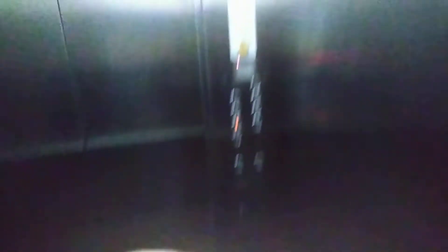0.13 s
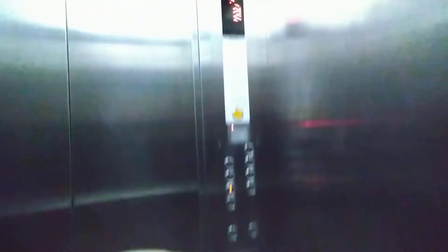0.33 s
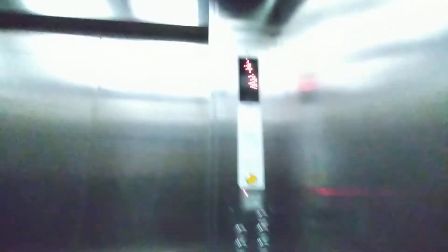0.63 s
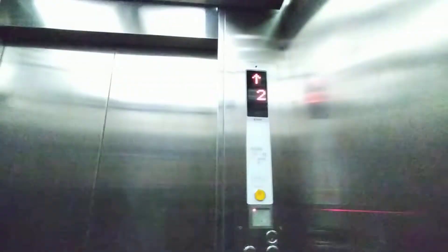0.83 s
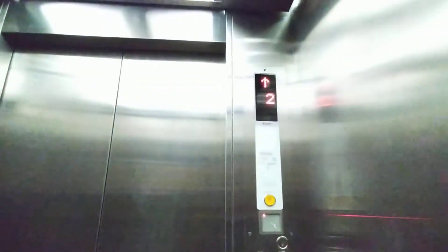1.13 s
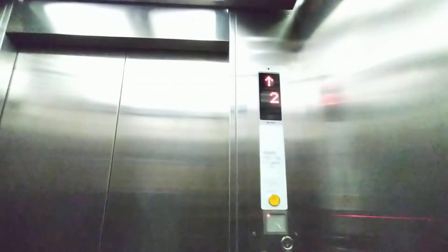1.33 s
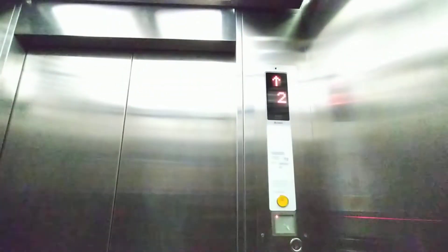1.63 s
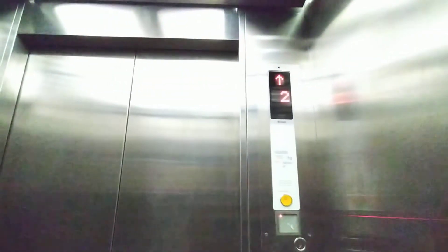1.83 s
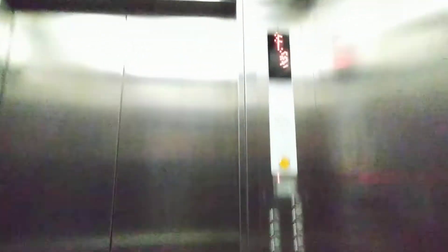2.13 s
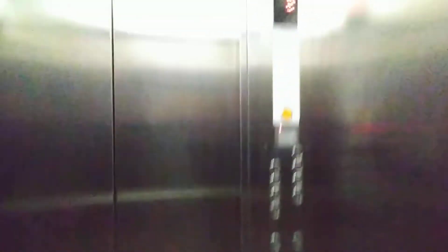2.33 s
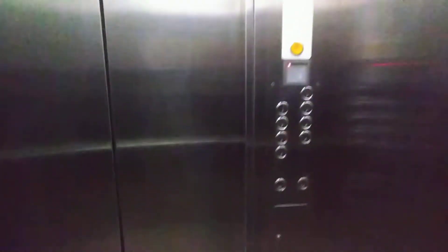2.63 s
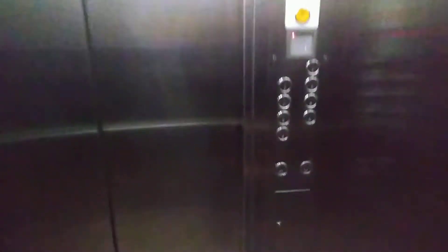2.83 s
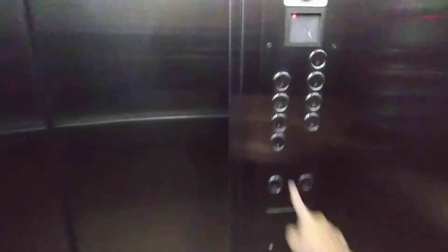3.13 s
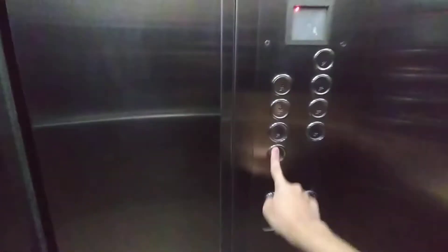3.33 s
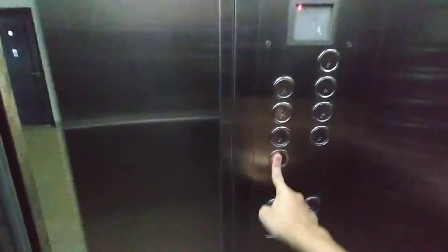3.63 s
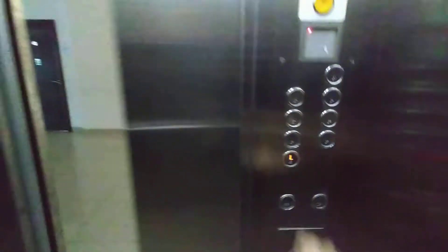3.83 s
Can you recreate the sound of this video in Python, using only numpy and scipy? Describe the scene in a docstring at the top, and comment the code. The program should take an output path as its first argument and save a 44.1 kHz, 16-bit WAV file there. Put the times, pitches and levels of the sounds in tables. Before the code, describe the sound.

Elevator doors opening, heard inside a steel car on a handheld microphone. A low motor hum and faint high whine run throughout; soft ride noise fades over the first second. A faint groan at 1.8 s, then a latch clank at 2.5 s; panels rumble, groan and scrape with cloth swishes. Around 3.5-3.6 s a button clicks, rollers thump rapidly, and a loud ringing clank lands near 3.86 s.

```python
"""Inside a steel elevator car: the motor hums, the ride noise dies away and the doors unlatch.
The panels roll open with a groan, scrapes, metal clanks and a run of roller thumps;
a sleeve swishes as an arm reaches out and clicks a button.
Rolling, cloth and machine noise are shaped random noise; groan, hum and whine are drifting sines;
struck steel is a sum of decaying modes with dense echoes, and scrapes are gliding resonances."""
import sys
import numpy as np
from scipy import signal
from scipy.fft import rfft, irfft
from scipy.io import wavfile

SR = 44100
rng = np.random.default_rng(int(sys.argv[2]) if len(sys.argv) > 2 else 0)


def to_wav(sig):
    """Store sig (one row per channel, or 1-D mono) as 16-bit WAV at the path in sys.argv[1].

    Samples outside -1..1 are clipped; the rate is SR.
    """
    pcm = np.clip(np.atleast_2d(sig), -1, 1) * 32767
    pcm = np.round(pcm).astype(np.int16)
    wavfile.write(sys.argv[1], SR, pcm.T)  # frames by channels


N = 176400
T = np.arange(N) / SR
HIT_T = T[:SR]  # time axis of one blow, 1 s

# Levels are relative to the sound's own gain factors; t60 is the time to decay by 60 dB.
# door panels rolling on their track: f/Hz, density/(dB per Hz)
ROLL_SPECTRUM = [(25, -112), (60, -83.5), (100, -84), (137, -65), (175, -69), (215, -68), (280, -67),
                 (380, -71.5), (480, -75), (650, -79), (1000, -87), (1600, -88.5), (3000, -97.5),
                 (4200, -111), (16000, -118)]
# swell of the rolling: t/s, level/dB
ROLL_LEVEL = [(2.0, -35), (2.25, -9), (2.44, -4.5), (2.52, -2), (2.68, 3), (2.8, -0.5), (2.93, -4),
              (3.04, 3.5), (3.2, -2.5), (3.32, -0.5), (3.42, -1), (3.48, 6), (3.58, 1.5), (3.66, 5),
              (3.86, 11), (4, 0.5)]
# rattle of the fast-moving panels: f/Hz, density/(dB per Hz)
RATTLE_SPECTRUM = [(25, -112), (80, -83), (170, -52), (330, -64.5), (430, -65.5), (520, -67), (650, -62.5),
                   (800, -78), (1100, -77), (1600, -80), (2500, -90.5), (3300, -104), (16000, -118)]
# course of the rattle: t/s, level/dB
RATTLE_LEVEL = [(3.4, -60), (3.52, -31), (3.605, -10), (3.64, 0), (3.86, -3.5), (3.93, -10), (4, -25)]
# resonances of the rattling panels: f/Hz, pole width/Hz, level/dB
PANEL_RESONANCES = [(167.1, 6.9, -35.5), (188.8, 10.6, -35.5), (547, 24, -54), (607, 79, -53),
                    (692, 23, -52)]
# roller thumps: t/s, level/dB
THUMPS = [(3.492, -36), (3.624, -24.5), (3.6468, -23), (3.671, -24.5), (3.718, -23), (3.7607, -21.5),
          (3.8036, -28), (3.8448, -27), (3.8987, -27.5), (3.951, -29.5)]
# boom of the car walls and knock of the panel: f/Hz, level/dB, t60/s
BOOM_MODES = [(145, -15, 0.18), (168.5, -6, 0.16), (189.5, -8, 0.14), (232, -12, 0.16), (310, -26, 0.11),
              (453, -16, 0.068), (618, -14.5, 0.16), (705, -16, 0.094)]
# the walls radiate little deep bass: f/Hz, level/dB
WALL_RESPONSE = [(20, -42), (55, -22), (100, -5.5), (150, -2), (700, -1), (2000, -10)]
# groans of a dragging panel: peak t/s, rise/(dB per s), fall/(dB per s), f/Hz, level/dB
GROANS = [(1.79, 200, 124, 282.8, -50.5), (2.466, 1200, 350, 270, -43), (2.615, 94, 300, 284.6, -42.5),
          (2.684, 305, 800, 280.5, -31.5), (2.804, 450, 452, 254.6, -40), (3.02, 156, 252, 283, -43.5),
          (3.29, 402, 133, 287.2, -48)]
# partials of a groan: multiple of its pitch, level/dB
GROAN_PARTIALS = [(1, 2), (1.3, -10.5), (1.92, -19.5)]
# scrapes and squeals of the door linkage:
# start t/s, length/s, start f/Hz, end f/Hz, pole width/Hz, fall/(dB per s), level/dB
SCRAPES = [(2.33, 0.29, 3050, 3070, 550, 65, -67), (2.464, 0.12, 2580, 2440, 300, 120, -48),
           (2.483, 0.18, 2535, 2550, 40, 24, -47.5), (2.557, 0.18, 3290, 2904, 805, 50, -53),
           (3.055, 0.21, 2884, 2560, 450, 50, -47.5), (3.263, 0.166, 1209, 1154, 590, 61, -49),
           (3.324, 0.084, 559, 535, 120, 61, -48.5), (3.52, 0.057, 3050, 2990, 130, 61, -48)]
# frequencies at which the clanks differ: f/Hz
CLANK_HZ = [400, 1300, 3000, 9000]
# latch and linkage clanks: t/s, four levels/dB at CLANK_HZ, ring level/dB, share of direct crack
CLANKS = [(2.463, -58, -60, -53.5, -72, -54, 0.63), (2.4699, -69, -56, -58, -69.5, -61, 3.1),
          (2.839, -50, -52.5, -58.5, -85, -66, 1.7), (3.063, -66, -50, -56, -69.5, -66, 1.7),
          (3.463, -54, -55.5, -61.5, -64, -65, 1), (3.527, -78, -51, -58.5, -69, -58, 0.69),
          (3.8152, -56, -55, -55, -60, -57, 2.74), (3.8213, -54, -52, -67, -78, -64, 3.5),
          (3.8568, -53, -49, -53, -56, -38, 1.9)]
# ring of the door steel: f/Hz, level/dB, t60/s
STEEL_MODES = [(1841, -2, 0.39), (2216, -6.5, 0.55), (2837, -8, 0.22), (3380, -8.5, .35), (3660, -4, 0.35),
               (3950, -7.5, 0.34), (4490, -10, 0.35)]
# sharp chinks as the door catch strikes and seats: t/s, level/dB
CHINKS = [(3.8585, -26.5), (3.8608, -31.5)]
# modes of the catch: f/Hz, level/dB, t60/s
CATCH_MODES = [(3560, -7, 0.012), (3760, 0.5, 0.01), (4480, -4, 0.023)]
# echo decay in the car: f/Hz, t60/s
CAR_T60 = [(200, 0.18), (1000, 0.49), (3000, 0.63), (7000, 0.42), (15000, 0.22)]
# sleeve swishes: peak t/s, rise/(dB per s), fall/(dB per s), level/dB
SWISHES = [(2.375, 186, 71, 2.5), (2.6, 72, 152, 2), (3.045, 98, 131, 5.5), (3.24, 203, 75, -10.5),
           (3.47, 138, 100, -6)]
# colour of the cloth: f/Hz, density/(dB per Hz)
CLOTH_SPECTRUM = [(100, -110), (1000, -88), (2000, -98), (3000, -90), (4200, -100), (7000, -97.5),
                  (9000, -95.5), (16000, -99.5)]
# touch and press of the button: t/s, level/dB, share of direct crack
CLICKS = [(3.447, -81, 2), (3.5266, -65.5, 2.1), (3.6012, -49.5, 0.78)]
# colour of the button click: f/Hz, level/dB
BUTTON_RESPONSE = [(100, -29), (2000, -6), (5000, -14), (7500, -9.5), (8400, -3.5), (9300, 0.5),
                   (10200, 0.5), (11500, -7.5), (13200, -3), (14300, -5), (16000, -5)]
# ring of the button cap: f/Hz, level/dB, t60/s
CAP_MODES = [(8350, -3, 0.25), (8670, -5, 0.2), (10160, -4, 0.2), (13063, 2, 0.24), (13400, -2, 0.22)]
# hum and whine of motor and drive, one row each: f/Hz, level/dB
MOTOR_TONES = [(100, -55), (15009, -83)]
# course of the hum: t/s, level/dB
HUM_LEVEL = [(0, 0), (.25, -7.5), (.5, 0.5), (1.3, -2), (4, 0)]
# course of the whine: t/s, level/dB
WHINE_LEVEL = [(0, -3), (.85, 3), (1.55, -7), (1.92, 8), (2.2, -6), (2.7, 4), (4, 9)]
# narrow resonances that the machine keeps ringing: f/Hz, pole width/Hz, level/dB
MACHINE_RESONANCES = [(275.4, 14, -63), (357, 8.7, -67.5), (405.5, 11.7, -66.5), (452.4, 10, -69),
                      (662.4, 8.6, -71.5), (946, 40, -73)]
# boom of the air in the car: peak t/s, rise/(dB per s), fall/(dB per s), level/dB
AIR_SWELLS = [(1.25, 118, 51, -50), (1.46, 52, 102, -50), (1.93, 51, 77, -48.5), (2.71, 52, 96, -43),
              (3.52, 243, 175, -35), (3.9, 35, 65, -36)]
# drone of the machine: f/Hz, density/(dB per Hz)
DRONE_SPECTRUM = [(20, -125), (40, -106), (60, -96), (85, -77.5), (112, -81), (137, -73.5), (170, -74),
                  (220, -81), (280, -80), (320, -82.5), (420, -84.5), (520, -93), (680, -91.5),
                  (1000, -96.5), (1500, -102), (2500, -110), (4000, -121), (8000, -127), (16000, -126)]
# course of the drone: t/s, level/dB
DRONE_LEVEL = [(0, -2.5), (.95, 0), (1.25, 1.5), (1.6, 0), (1.9, 2), (4, -19)]
# ride noise of the car coming to rest: f/Hz, density/(dB per Hz)
RIDE_SPECTRUM = [(50, -115), (130, -78), (400, -85), (600, -93), (900, -92), (1130, -100), (1350, -93.5),
                 (2020, -104), (2330, -97), (2800, -107), (3400, -109), (4000, -117), (9000, -121),
                 (16000, -124)]
# dying away of the ride noise: t/s, level/dB
RIDE_LEVEL = [(0, 2.5), (.52, 0), (.7, -7.5), (1.1, -13.5), (2, -29)]
# microphone colour: f/Hz, level/dB
MIC_RESPONSE = [(3000, 0), (3600, 0), (4200, -2.5), (4700, 0.5), (5600, -0.5), (7000, -1), (8000, 5),
                (8600, 6.5), (9500, 0), (11000, -2.5), (12200, -2.5), (14000, 2.5), (15700, 9.5)]

THUMP_S, THUMP_PUSH = 0.00091, 1.05  # time scale and size of the push
GROAN_DRIFT_HZ = 4.1
SCRAPE_RISE_S, SCRAPE_FADE_S, SCRAPE_JITTER_HZ = 0.012, 0.063, 22
CLANK_RISE_S, STEEL_WIDTH_HZ = 0.0045, 86
HUM_WAVER_DB, HUM_DRIFT_HZ = 3, 0.83
AIR_HZ, AIR_DRIFT_HZ = 135.1, 2.55
EDGE_HZ = 15830  # upper band limit


def doors(bumpy_db=1.5, rattle_db=2):
    """Rolling and impact excitation: noise through panel resonances, and thumps that excite modes."""
    rolling = noise(ROLL_SPECTRUM) * level(ROLL_LEVEL) * amp(bumpy_db * wander(21))
    panels = noise(RATTLE_SPECTRUM) + resonances(PANEL_RESONANCES)
    out = rolling + panels * level(RATTLE_LEVEL) * amp(rattle_db * wander(59))
    push = np.exp(-(HIT_T / THUMP_S - 1) ** 2) * np.minimum(HIT_T / THUMP_S, 1)
    for s, db in THUMPS:
        thump = ring(BOOM_MODES, scatter_db=2.5) + THUMP_PUSH * push
        add(out, s, -amp(db) * colour(thump, WALL_RESPONSE))
    return out


def groans(lumpy_db=2.5):
    """Stick-slip friction: a dragging panel sounds partials of drifting pitch and lumpy level."""
    drift = 2 * np.pi * np.cumsum(GROAN_DRIFT_HZ * wander(31)) / SR
    out = np.zeros(N)
    for s, rise, fall, hz, db in GROANS:
        phase = 2 * np.pi * hz * T + drift
        note = sum(amp(part_db) * np.sin(ratio * phase) for ratio, part_db in GROAN_PARTIALS)
        out += np.sqrt(2) * note * swells([(s, rise, fall, db)])
    return out * amp(lumpy_db * wander(70))


def linkage(rough_db=2):
    """Sliding friction: steel on steel excites rough resonances that glide in pitch and die away."""
    out = np.zeros(N)
    for s, length, start_hz, end_hz, width, fall, db in SCRAPES:
        t = T[:round(length * SR)]
        fade = np.minimum(np.minimum(t / SCRAPE_RISE_S, (length - t) / SCRAPE_FADE_S), 1)
        glide = np.interp(HIT_T, (0, length), (start_hz, end_hz))
        hz = glide + SCRAPE_JITTER_HZ * wander(47)[:SR]
        scrape = band(hz, width, count=SR, steady=0.66)[:len(t)]
        add(out, s, amp(db - fall * t) * fade * scrape)
    return out * amp(rough_db * wander(140))


def latch(bass_db=-18, presence_db=-7, upper_db=1, top_db=-2):
    """Impact and reverberation: each clank rings the door steel and echoes round the car."""
    out = np.zeros(N)
    for s, low, mid, high, treble, ring_db, direct in CLANKS:
        # levels between and beyond the tabulated frequencies follow their neighbours
        edges = [(60, low + bass_db), (4600, high + presence_db),
                 (6000, treble + upper_db), (15000, treble + top_db)]
        shape = sorted([*edges, *zip(CLANK_HZ, (low, mid, high, treble))])
        clank = colour(impact(CLANK_RISE_S, direct, crack_s=0.0027), shape)
        add(out, s, clank + amp(ring_db) * steel())
    for s, db in CHINKS:
        add(out, s, amp(db) * ring(CATCH_MODES))
    return out


def steel():
    """Modal density: clusters of close modes make each ring of the door steel shimmer."""
    modes = sum(amp(db - 60 * HIT_T / t60) * band(hz, STEEL_WIDTH_HZ, count=SR)
                for hz, db, t60 in STEEL_MODES)
    return modes * (1 - np.exp(-HIT_T / CLANK_RISE_S))


def passenger(grain_db=1.5, cap_db=3):
    """Cloth friction and impact: grainy noise for the sleeve, then a click that rings the button cap."""
    out = noise(CLOTH_SPECTRUM) * swells(SWISHES) * amp(grain_db * wander(120))
    for s, db, direct in CLICKS:
        click = colour(impact(rise_s=0.0031, direct=direct, crack_s=0.0023), BUTTON_RESPONSE)
        add(out, s, amp(db) * (click + amp(cap_db) * ring(CAP_MODES)))
    return out


def motor(whine_waver_db=2.0):
    """Forced vibration: wavering tones and car resonances over the drone and the fading ride noise."""
    (hum_hz, hum_db), (whine_hz, whine_db) = MOTOR_TONES
    hum_gain = amp(hum_db + HUM_WAVER_DB * wander(0.53)) * level(HUM_LEVEL)
    out = tone(hum_hz, HUM_DRIFT_HZ, rate=6.7) * hum_gain
    whine_gain = amp(whine_db + whine_waver_db * wander(7.1)) * level(WHINE_LEVEL)
    out += tone(whine_hz, drift_hz=4, rate=6.5) * whine_gain
    out += resonances(MACHINE_RESONANCES)
    out += tone(AIR_HZ, AIR_DRIFT_HZ, rate=15.3) * swells(AIR_SWELLS)
    drone = noise(DRONE_SPECTRUM) * level(DRONE_LEVEL)
    ride = noise(RIDE_SPECTRUM) * level(RIDE_LEVEL)
    return out + drone + ride


def impact(rise_s, direct, crack_s):
    """Reverberation: a short crack and its dense echoes, decaying at a rate set by frequency."""
    hz, t, z = signal.stft(rng.standard_normal(SR), SR, nperseg=256)
    decay = amp(-60 * t / read(CAR_T60, hz)[:, None])
    tail = signal.istft(z * decay, SR, nperseg=256)[1][:SR]
    crack = rng.standard_normal(SR) * np.exp(-HIT_T / crack_s)
    return 10 * (tail * (1 - np.exp(-HIT_T / rise_s)) + direct * crack)


def ring(modes, scatter_db=0):
    """Modal decay: dying sines of a struck body, with mode levels scattered from blow to blow."""
    out = np.zeros(SR)
    for hz, db, t60 in modes:
        mode_db = db + scatter_db * rng.standard_normal()
        out += amp(mode_db - 60 * HIT_T / t60) * np.sin(2 * np.pi * hz * HIT_T)
    return out


def band(hz, width, count, steady=0):
    """Resonance: noise of rms 1 about a pitch that can glide; steady (0-1) evens out its level."""
    pole = np.exp(-np.pi * width / SR)
    z = rng.standard_normal(count + SR) + 1j * rng.standard_normal(count + SR)
    z = signal.lfilter([1], np.poly([pole, pole]), z)[SR:]  # drop the first second of build-up
    carrier = np.exp(2j * np.pi * np.cumsum(hz * np.ones(count)) / SR)
    x = (z / abs(z) ** min(steady, 1) * carrier).real
    return x / x.std()


def resonances(rows):
    """Superposition: independent resonances add."""
    return sum(amp(db) * band(hz, width, count=N) for hz, width, db in rows)


def tone(hz, drift_hz, rate):
    """Frequency modulation: a sine of rms 1 whose pitch wanders."""
    return np.sqrt(2) * np.sin(2 * np.pi * np.cumsum(hz + drift_hz * wander(rate)) / SR)


def noise(points):
    """Spectral shaping: white noise weighted to the given density in dB per Hz."""
    gain = amp(read(points, np.fft.rfftfreq(N, 1 / SR))) * np.sqrt(SR / 2)
    return irfft(rfft(rng.standard_normal(N)) * gain, N)


def wander(rate):
    """Low-passed noise: smooth random motion of rms 1, faster for a higher rate in Hz."""
    lowpass = np.exp(-(np.fft.rfftfreq(N, 1 / SR) / rate) ** 2)
    x = irfft(rfft(rng.standard_normal(N)) * lowpass, N)
    return (x - x.mean()) / x.std()


def swells(rows):
    """Energy summation: gain that rises to each peak and falls again, summed in power."""
    power = np.zeros(N)
    for s, rise, fall, db in rows:
        power += amp(db - np.maximum((s - T) * rise, (T - s) * fall)) ** 2
    return np.sqrt(power)


def colour(x, points, size=8192):
    """Minimum-phase filtering: a causal filter with the given f/Hz, level/dB response."""
    log_gain = np.log(amp(read(points, abs(np.fft.fftfreq(size, 1 / SR)))))
    taps = np.fft.ifft(np.exp(np.conj(signal.hilbert(log_gain)))).real[:size // 2]
    return signal.fftconvolve(x, taps)[:len(x)]


def amp(db):
    """Decibel definition: level to amplitude gain."""
    return 10 ** (np.asarray(db) / 20)


def read(points, hz):
    """Log-frequency interpolation: reads a table at the given frequencies."""
    f, value = np.transpose(points)
    return np.interp(np.log(hz + 1), np.log(f + 1), value)


def level(points):
    """Envelope: gain over time from t/s, level/dB points."""
    return amp(np.interp(T, *np.transpose(points)))


def add(mix, s, sound):
    """Superposition: adds a sound into the mix at time s in seconds."""
    part = mix[round(s * SR):][:len(sound)]
    part += sound[:len(part)]


def scene():
    """Superposition of everything heard in the car."""
    return (doors() + groans() + linkage() + latch() + passenger() + motor())[None]


def record(dry):
    """Linear filtering: the microphone colour, then the upper band limit."""
    coloured = colour(dry[0], MIC_RESPONSE)
    lowpass = signal.firwin(511, EDGE_HZ, window=("kaiser", 9), fs=SR)
    return signal.oaconvolve(coloured, lowpass, "same")[None]


dry = scene()
out = record(dry)
to_wav(out)
```